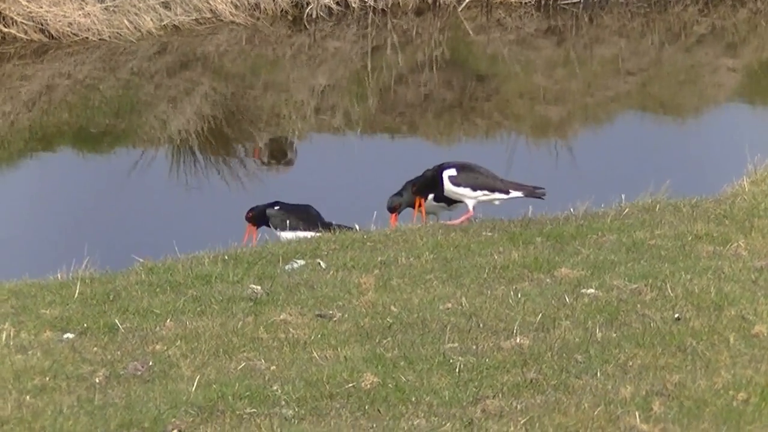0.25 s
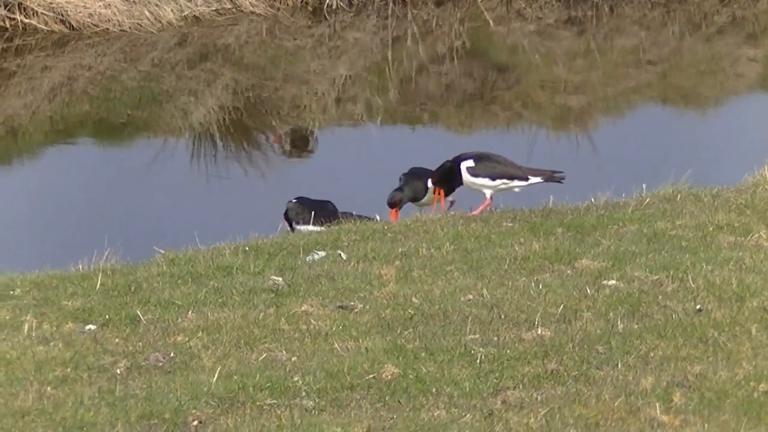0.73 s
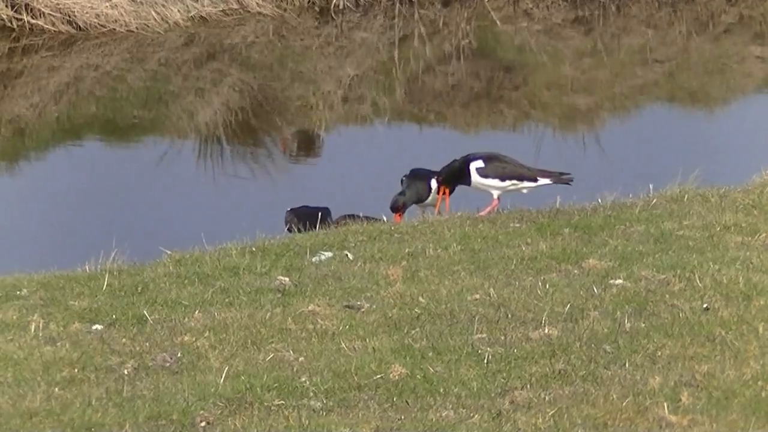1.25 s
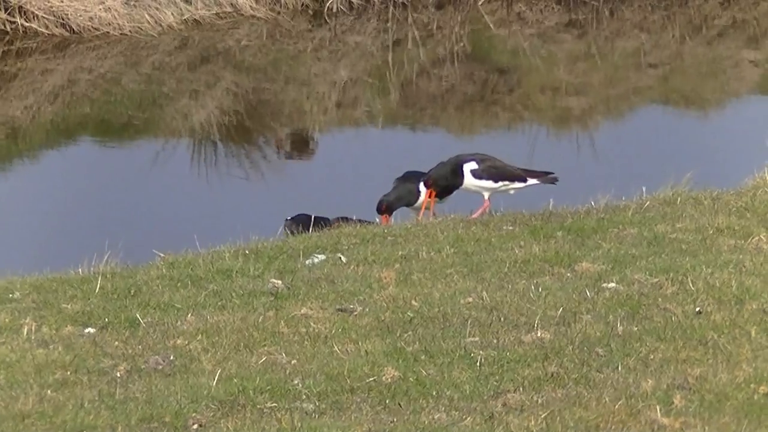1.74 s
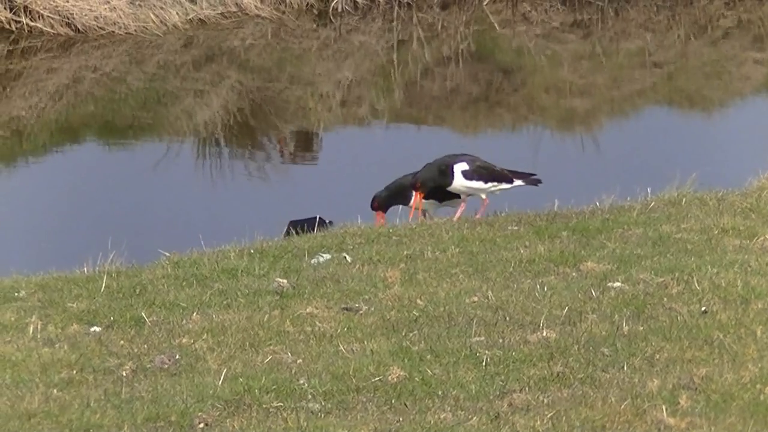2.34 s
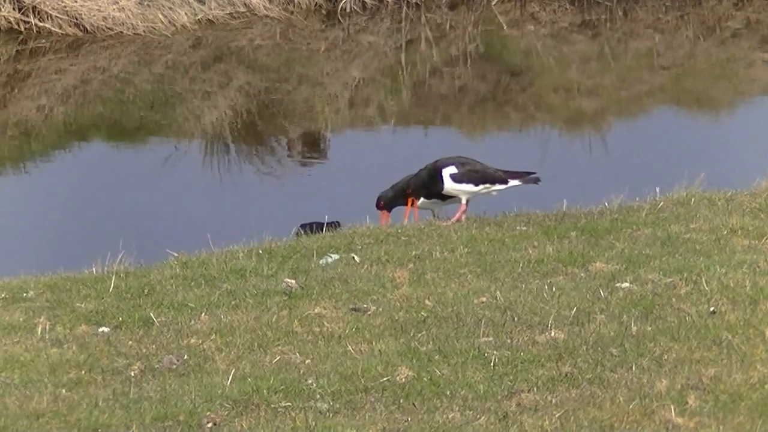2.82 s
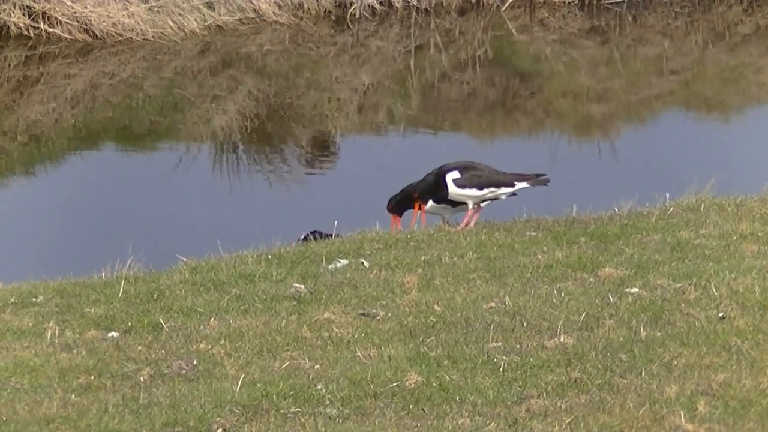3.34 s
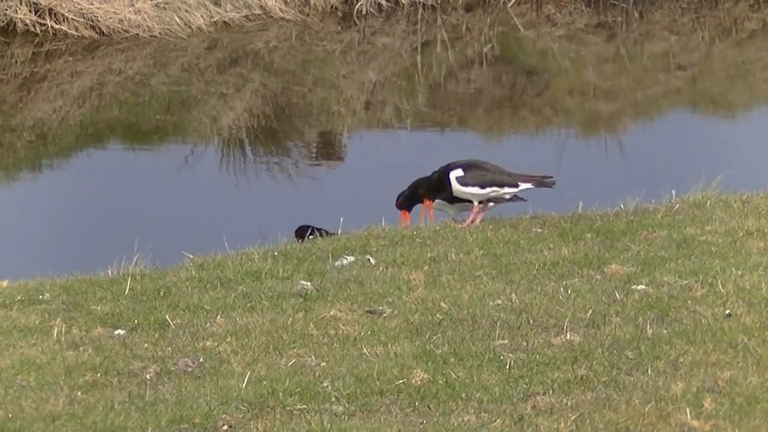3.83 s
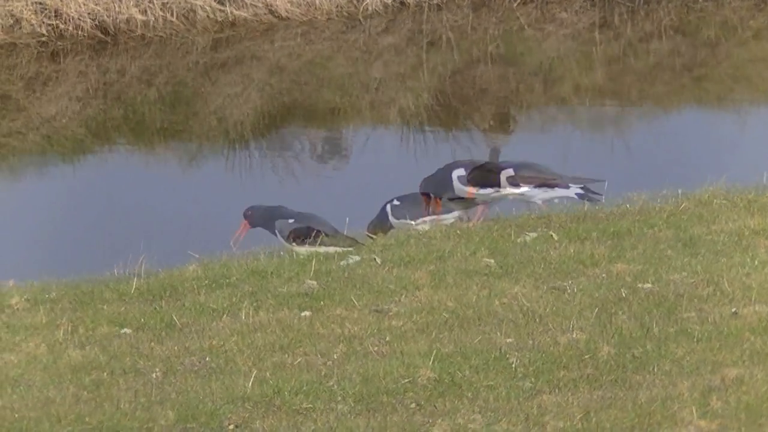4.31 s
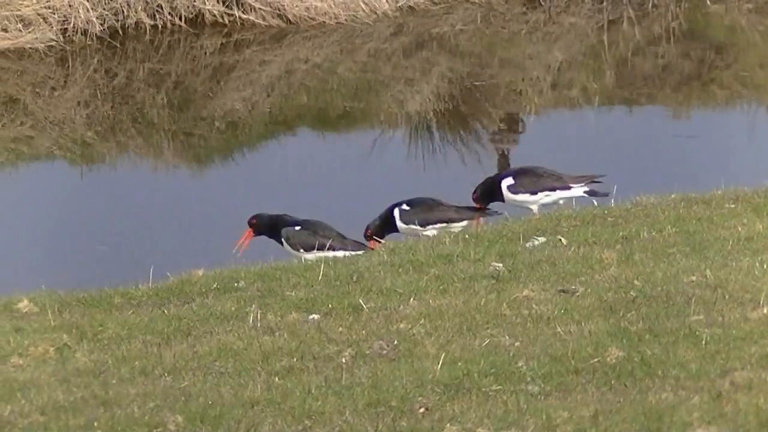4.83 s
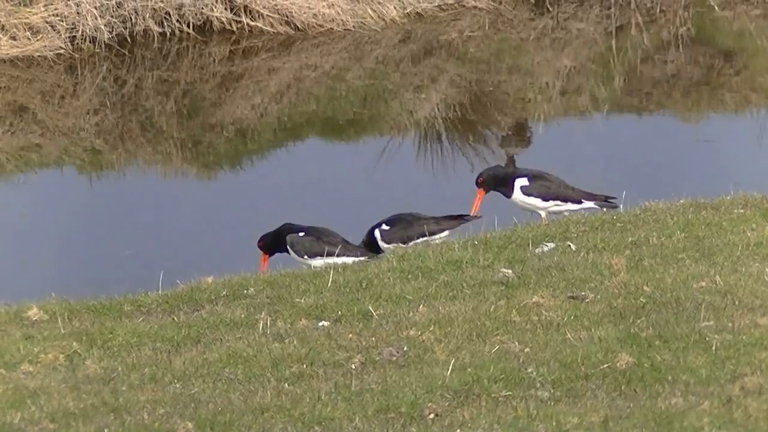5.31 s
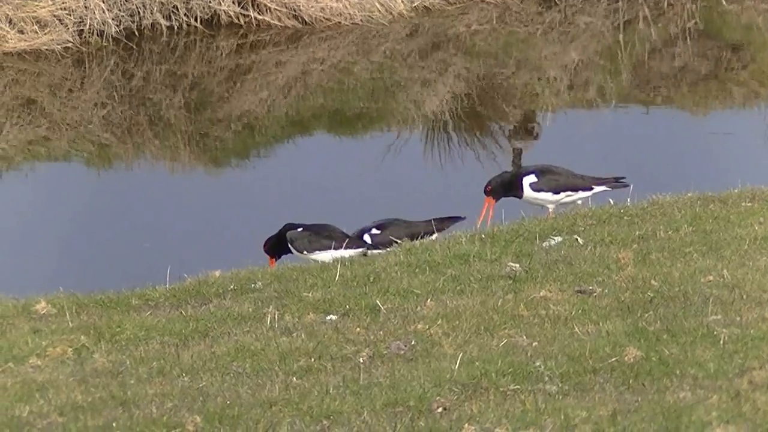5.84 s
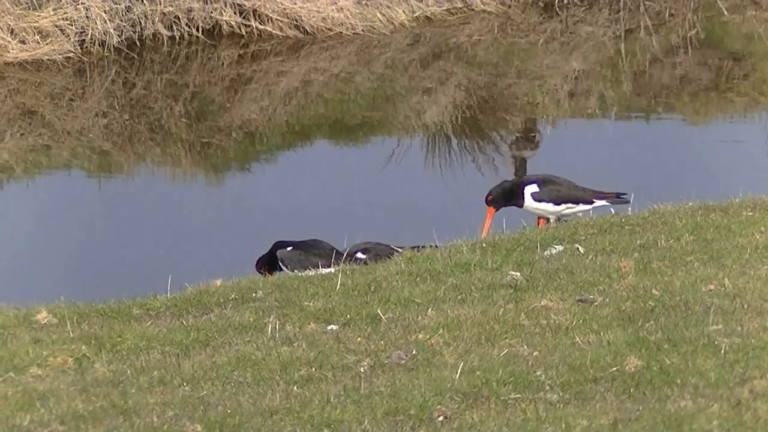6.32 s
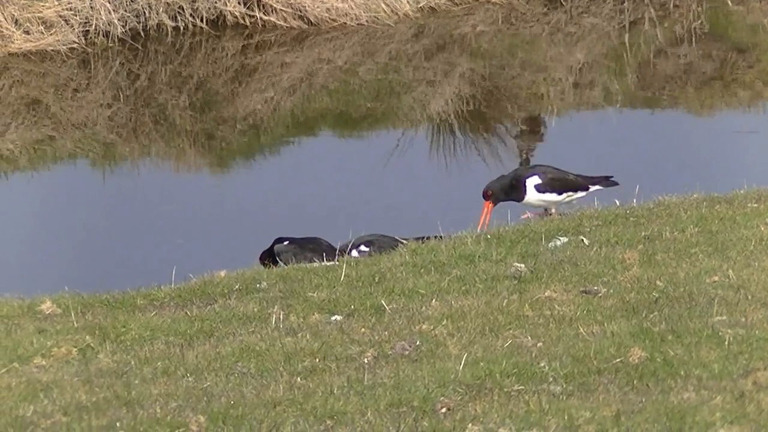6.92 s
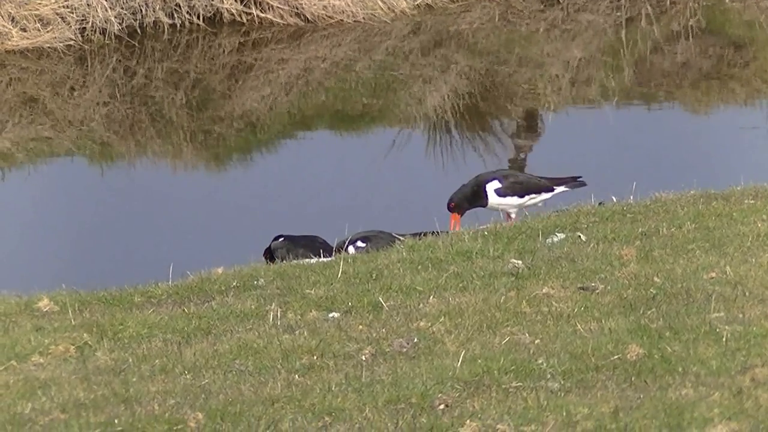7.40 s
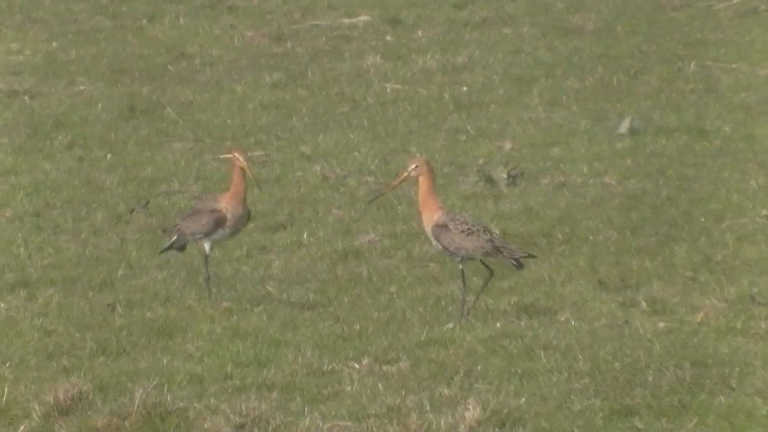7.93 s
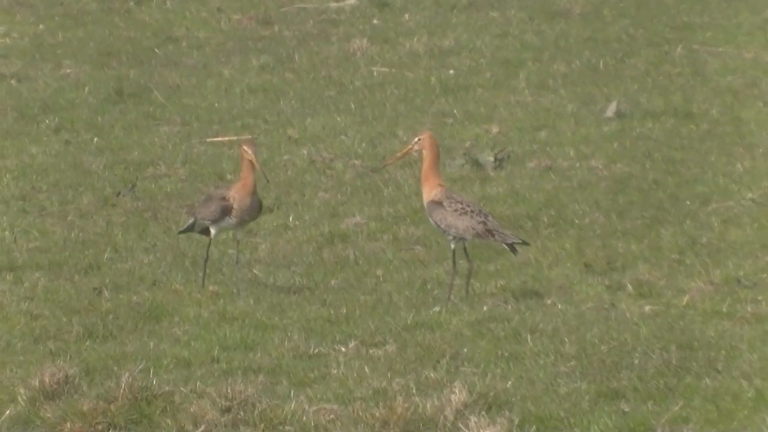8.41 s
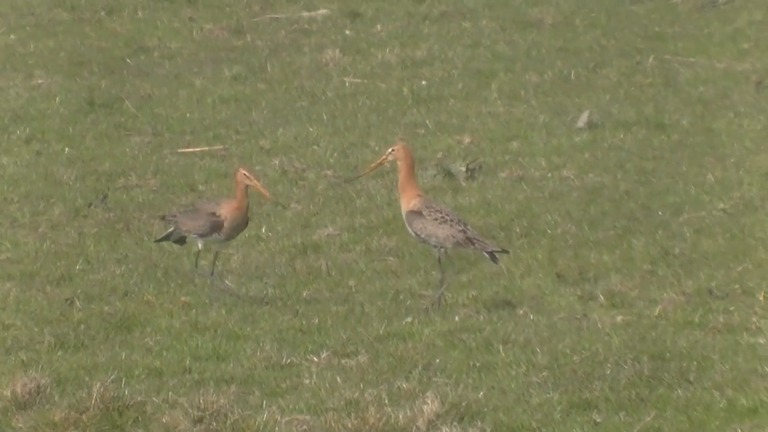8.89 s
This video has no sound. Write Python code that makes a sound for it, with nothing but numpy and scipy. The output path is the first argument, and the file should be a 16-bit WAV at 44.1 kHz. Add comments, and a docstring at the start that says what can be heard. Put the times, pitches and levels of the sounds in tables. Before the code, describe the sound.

Piercing wader whistles repeat in fast runs and pairs outdoors, lower trills bubbling behind, while light gusts thump the microphone before everything fades.

```python
"""Oystercatchers pipe at a ditch in open meadow: short arched whistles, near the microphones, echoed by the far bank.
Some pipe in runs, evenly spaced or irregular, one calls in pairs; others trill low rising notes, pipe or wail
further off. Each bird is a gliding stack of overtones shaped by a throat, with a little air noise. Filtered
noise makes the meadow hiss, the rumble and the gusts on the left port; decaying sines tick in the camera,
a steady one whines. Birds and meadow fade at the end."""
import sys
import numpy as np
from scipy import signal
from scipy.fft import rfft, irfft, next_fast_len
from scipy.io import wavfile
from scipy.ndimage import map_coordinates

SR = 44100
rng = np.random.default_rng(int(sys.argv[2]) if len(sys.argv) > 2 else 0)


def store_pcm(level_fs):
    """Save levels as 16-bit WAV."""
    pcm = np.round(np.clip(level_fs, -1, 1) * 32767).astype(np.int16)
    wavfile.write(sys.argv[1], SR, np.atleast_2d(pcm).T)


N = 403515
T = np.arange(N) / SR


def amp(db):
    """Gain of a level in dB."""
    return 10 ** (np.asarray(db) / 20)


def unit(x):
    """x at rms 1."""
    return x / np.sqrt(np.mean(x ** 2) + 1e-20)


def at_time(s, rows):
    """Value at s seconds, on straight lines between (s, value) rows."""
    return np.interp(s, *np.transpose(rows))


def along(points, hz):
    """(Hz, value) points read on a log frequency axis."""
    f, v = np.transpose(points)
    return np.interp(np.log(hz + 1), np.log(f + 1), v)


def wobble(rate_hz, size):
    """A smooth random curve through rate_hz random knots a second."""
    knots = rng.standard_normal(int(size * rate_hz / SR) + 4)
    return map_coordinates(knots, [np.arange(size) * rate_hz / SR])


def filtered(x, response):
    """x with its spectrum multiplied by a response of frequency."""
    m = next_fast_len(x.shape[-1] + 8192)
    spectrum = rfft(x, m) * response(np.fft.rfftfreq(m, 1 / SR))
    return irfft(spectrum, m)[..., :x.shape[-1]]


# steady wind at the ports, before the port offsets and sway: time_s, level_db
RUMBLE_LEVEL = [(0, -65), (3.9, -48.5), (4.3, -58), (6, -67), (9.15, -92)]
# hiss of the meadow: time_s, level_db
HISS_LEVEL = [(3, -50.5), (8, -49.5), (8.6, -55), (9.15, -61.5)]
# colour of the meadow hiss: freq_hz, density_db (per Hz)
HISS_COLOUR = [(100, -5.5), (700, -8.5), (1300, -3.5), (3000, -3), (6000, -21), (12000, -22), (15500, -40)]


def breeze():
    """Low wind rumble, unrelated between the ports, and soft meadow hiss that is wide only in its bass."""
    low = filtered(rng.standard_normal((2, N)), lambda f: (f / 100) ** 2.47 / (1 + (f / 120) ** 5.53))
    port_gain = amp([[3], [-5]])  # left, right
    sway = amp(2.5 * wobble(12, N))
    rumble = amp(at_time(T, RUMBLE_LEVEL)) * port_gain * unit(low) * sway
    mid, side = filtered(rng.standard_normal((2, N)), lambda f: amp(along(HISS_COLOUR, f)))
    side = filtered(side, lambda f: 0.98 / (1 + f / 900))
    hiss = unit(np.array([mid + side, mid - side]))
    return rumble + amp(at_time(T, HISS_LEVEL)) * hiss


# gusts on the left microphone port: start_s, end_s, level_db (before the edges), centre_hz
GUST_TIMES = [(0, 1, -42, 86), (0.754, 0.962, -33.5, 103), (3.248, 3.448, -39, 84),
              (3.647, 3.763, -29, 105), (3.855, 3.967, -27.5, 131), (4.255, 4.612, -37, 233),
              (4.77, 5.012, -31.5, 313), (5.241, 5.737, -41, 267), (6.441, 6.742, -48, 220),
              (7.728, 7.794, -36.5, 222), (7.802, 8.3, -57, 195), (8.874, 8.989, -34.5, 338)]


def gusts():
    """Turbulence hits the left port in sharp lumps of noise; the right port feels little of it."""
    out = np.zeros((2, N))
    for start, end, db, hz in GUST_TIMES:
        span = slice(round(start * SR), round(end * SR))
        size = len(T[span])
        lump_db = 7 * np.array([wobble(160, size), wobble(160, size)])
        lumps = rng.standard_normal((2, size)) * amp(lump_db)
        band = lambda f: (f / hz) ** 1.52 / (1 + (f / hz) ** 4.07) / (1 + (55 / (f + 1)) ** 3)
        edge = np.clip(np.minimum(T[span] - start, end - T[span]) / 0.022, 0, 1)
        out[:, span] += amp(db) * amp([[0], [-14]]) * edge * unit(filtered(lumps, band))
    return out


# clicks in the camera housing: time_s, level_db
TICK_TIMES = [(2.199, -22), (6.021, -31.5), (8.643, -37.5)]
# thin steady tone of the camera: freq_hz, level_db
WHINE_TONES = [(14562, -78)]


def camera():
    """Ticks ring the housing as two fast-decaying sines; a thin whine is always there."""
    out = np.zeros(N)
    t = np.arange(SR // 50) / SR
    body_swell = amp(-60 * t / .012) * (1 - np.exp(-t / .0006))
    body = 1.6 * body_swell * np.sin(2 * np.pi * 900 * t)
    click = 2 * amp(-60 * t / .002) * np.sin(2 * np.pi * 3300 * t)
    for s, db in TICK_TIMES:
        out[round(s * SR):][:len(t)] += amp(db) * (body + click)
    for hz, db in WHINE_TONES:
        out += amp(db) * np.sin(2 * np.pi * hz * T)
    return out


# resonance of the throat: freq_hz, gain_db
THROAT_GAIN = [(1000, -12), (2500, 6), (3300, 6.5), (5000, 4), (6500, -4), (7500, -2), (10500, -7.5),
               (13300, -17.5), (15000, -32)]
# beaming of overtones above SHINE_HZ from the bill: time_s, gain_db
BILL_SHINE = [(4.3, -1.5), (6.4, 1), (7.3, -6)]
SHINE_HZ = 9200
FALL_DEEPER = 1.653  # sag after the top over the sag setting
ONSET = .35  # swell exponent before the top; under 1 = abrupt start
CLIMB_PER_S = 20.5  # fastest climb, share of the pitch a second: quick notes start near their top
RASP_DB, RASP_HZ = -20, 9000  # air noise before its band filter; upper band edge


def whistles(notes, rise_s, fall_s, sag, flat, overtone_db, rough_db):
    """Arched notes (s, Hz, dB): pitch sags either side of its top, overtones pass the throat, air rasps."""
    out, air = np.zeros((2, N + SR))
    t = np.arange(-round(rise_s * SR), round(fall_s * SR)) / SR  # 0 at the top of the note
    from_top = np.clip(np.where(t < 0, -t / rise_s, t / fall_s), 0, 1)
    depth = np.where(t < 0, min(sag, CLIMB_PER_S * rise_s), sag * FALL_DEEPER)
    arch = 1 - depth * from_top ** flat
    swell = np.abs(np.cos(np.pi / 2 * from_top)) ** np.where(t < 0, ONSET, 1)
    order = np.arange(1, 7)[:, None]
    effort = swell ** (0.71 + 0.5 * (order - 1))  # overtones need full effort, so they fade first
    for s, hz, db in notes:
        pitch = hz * arch * (1 + .008 * wobble(400, size=len(t)))
        phase = 2 * np.pi * np.cumsum(pitch) / SR
        slope_db = at_time(s, overtone_db) - 9 * max(hz / 2600 - 1, 0)  # higher notes are purer
        posture_db = (order > 1) * rng.normal(0, 1.5, order.shape)
        posture_db = posture_db + (order * hz > SHINE_HZ) * at_time(s, BILL_SHINE)
        throat_db = along(THROAT_GAIN, order * pitch) - along(THROAT_GAIN, hz)
        gains = amp(slope_db * (order - 1) + posture_db + throat_db)
        lead = rng.normal(0, .7, order.shape)  # phase offset, radians
        audible = order * pitch < SR / 2
        tone = np.sum(gains * effort * audible * -np.cos(order * phase + lead), axis=0)
        start = round((s + t[0]) * SR) + SR // 4  # a quarter second of padding in front
        air[start:][:len(t)] += amp(db + RASP_DB + slope_db) * swell
        out[start:][:len(t)] += amp(db) * tone
    flutter = amp(rough_db * wobble(180, size=N))
    air_band = signal.butter(2, [RASP_HZ / 2, RASP_HZ], 'band', fs=SR, output='sos')
    rasp = signal.sosfilt(air_band, rng.standard_normal(N + SR))
    return (out + air * rasp)[SR // 4:][:N] * flutter


# distant piping as a whole: time_s, level_db
FAR_LEVEL = [(4, -46), (5, -54), (8.3, -53), (9.15, -68)]


def far_birds(count):
    """Distant piping at random moments: scattered pitches at first, later mostly one bird."""
    when, pitch, size = rng.random((count, 3)).T
    s = (np.arange(count) + when) / count * N / SR  # one note per equal slot, so the chorus never pauses
    hz = 2750 - np.where(s < 4, 650, 220) * pitch
    chorus = whistles(zip(s, hz, -6 * size), rise_s=.022, fall_s=.02, sag=.45, flat=1.6,
                      overtone_db=[(0, -6)], rough_db=.5)
    return amp(at_time(T, FAR_LEVEL)) * unit(chorus)


# birds repeating a low rising note: first_s, notes (count), spacing_s, slowing_s (times note number squared),
# top_pitch_hz, level_db (mean), rise_s, sag (share of pitch)
TRILL_SERIES = [(.176, 21, .1745, .00047, 1460, -47, .095, .33), (.02, 19, .2075, 0, 1470, -48, .095, .33),
                (4.56, 18, .189, 0, 1290, -53, .06, .14), (8.02, 2, .235, 0, 1370, -48, .07, .12)]


def trills():
    """Low notes rise, break off at once and repeat with slightly uneven timing and level."""
    out = np.zeros(N)
    for first, count, spacing, slowing, hz, db, rise_s, sag in TRILL_SERIES:
        notes = []
        for n in range(count):
            s = first + n * spacing + n * n * slowing + rng.normal(0, 0.004)
            notes.append((s, hz, db + rng.normal(0, 2.5)))
        out = out + whistles(notes, rise_s, fall_s=0.00776, sag=sag, flat=1.6,
                             overtone_db=[(0, -6.0)], rough_db=1.0)
    return out


# overtone strength of the near birds, brighter, a little duller, brightest at the end:
# time_s, overtone_db (gained per overtone)
NEAR_BRIGHTNESS = [(1, -1), (2.3, 0.06), (7.3, -0.64), (7.9, 0.5)]


def pipe(notes, rise_s, sag, fall_s=0.03, bright_db=0, flat=2.4):
    """The shared voice of the near birds: arched whistles whose overtone strength shifts over time."""
    brightness = [(s, db + bright_db) for s, db in NEAR_BRIGHTNESS]
    return whistles(notes, rise_s, fall_s, sag, flat, overtone_db=brightness, rough_db=1.3)


# single near notes by posture, bill away, sideways, toward the camera:
# bright_db (per overtone, added to the near brightness), rise_s, notes [top_s, top_pitch_hz, level_db];
# the hidden high notes use their own brightness and rise
SINGLE_NOTES = [(-3.5, .011, [(1.309, 2540, -26), (1.578, 2520, -29.5), (2.367, 2640, -30),
                (2.536, 2583, -32), (6.7, 2530, -29), (8.645, 3220, -42.5)]),
                (-0.54, .009, [(0.343, 2584, -27), (.89, 2620, -31.5), (1.211, 2616, -33.5),
                (1.495, 2620, -34), (2.671, 2670, -34.5), (2.971, 2646, -31), (3.413, 2625, -31),
                (3.555, 2660, -32), (4.191, 2640, -33), (5.242, 2540, -31), (6.724, 2600, -32.5),
                (7.06, 2610, -31.5), (7.234, 3170, -32), (7.265, 2514, -27.5), (7.349, 2555, -31),
                (7.43, 3233, -31), (7.462, 2464, -31), (7.544, 2560, -34.5), (7.673, 3310, -30),
                (7.701, 2410, -33), (7.824, 2705, -30), (7.888, 3320, -30.5), (8.035, 2720, -36),
                (8.05, 3080, -33.5), (8.085, 2650, -33), (8.15, 3260, -32), (8.298, 3066, -38),
                (8.31, 2670, -35.5), (8.409, 3276, -35), (8.423, 2590, -39.5), (8.56, 2654, -41.5),
                (8.79, 2700, -51)]), (1.5, .014, [(.047, 2533, -37), (6.448, 2495, -34.5)])]
HIDDEN_S, HIGH_HZ, HIDDEN_ECHO_DB = 7.2, 2900, 10.5


def single_notes():
    """Single arches, direct and sent to the bank; the late high piper, behind the near slope, echoes more."""
    seen, hidden_notes = np.zeros(N), []
    for bright_db, rise_s, notes in SINGLE_NOTES:
        hidden_here = [note for note in notes if note[0] >= HIDDEN_S and note[1] >= HIGH_HZ]
        seen_here = [note for note in notes if note not in hidden_here]
        seen = seen + pipe(seen_here, rise_s, 0.193, bright_db=bright_db)
        hidden_notes += hidden_here
    hidden = pipe(hidden_notes, 0.017, 0.29, fall_s=0.023, bright_db=-1.5)
    return seen + hidden, seen + amp(HIDDEN_ECHO_DB) * hidden


# runs of near notes sharing a pitch and level course, some evenly spaced, some irregular:
# tops [top_s], course [time_s, top_pitch_hz, level_db], rise_s, fall_s, sag (share of pitch),
# bright_db (per overtone, added to the near brightness), echo_db (sound sent to the bank)
NOTE_RUNS = [([.587, 0.974, 1.175, 1.389, 1.595, 1.801, 2, 2.209, 2.408, 2.617, 2.825, 3.035, 3.238, 3.428, 3.625, 3.83, 4.04, 4.242],
             [(.6, 2530, -32.5), (1, 2428, -33), (1.8, 2476, -28), (2, 2434, -33), (2.4, 2457, -28.5),
             (3.2, 2495, -31.5), (3.65, 2581, -26), (4.25, 2582, -30.5)], 0.0073, 0.024, 0.21, 0.33, -2),
             ([.118, .625, .835, 1.06], [(.65, 2660, -26.5), (.8, 3020, -26)], 0.012, .022, .2, -4.5, 2.2),
             ([3.31, 3.509, 3.71, 3.916, 4.122, 4.322], [(3.3, 2400, -35.5), (3.9, 2467, -31),
             (4.15, 2560, -31)], 0.0093, 0.03, 0.2, 0.093, -0.41),
             ([2.099, 2.297, 2.498, 2.92, 3.125, 3.37], [(2.1, 2270, -40), (3.4, 2210, -42.5)],
             .012, 0.024, 0.25, 0.1, -0.86), ([4.065, 4.292, 4.547], [(4.06, 3020, -39), (4.55, 2974, -29)],
             0.024, 0.03, 0.24, 0.1, 2.3), ([4.119, 4.355, 4.593, 4.814, 4.993, 5.149], [(4.1, 3360, -29),
             (4.6, 3326, -18.5), (5.15, 3230, -22.5)], 0.017, .022, 0.182, 0.11, -0.15),
             ([5.287, 5.414, 5.53, 5.651, 5.779, 5.884, 5.983, 6.082, 6.172, 6.251, 6.337, 6.421, 6.508, 6.602, 6.861, 7.004, 7.179, 7.615],
             [(5.28, 3140, -30), (6, 2998, -31.5), (6.55, 2842, -37.5), (6.85, 2560, -39)],
             .015, 0.025, 0.211, -1.6, 5.4)]


def piping_runs():
    """Runs of arches whose pitch and level follow a shared course; direct and as sent to the bank."""
    direct, sent = np.zeros((2, N))
    for times, course, rise_s, fall_s, sag, bright_db, echo_db in NOTE_RUNS:
        s, hz, db = np.transpose(course)
        notes = list(zip(times, np.interp(times, s, hz), np.interp(times, s, db)))
        whistled = pipe(notes, rise_s, sag, fall_s, bright_db)
        direct += whistled
        sent += amp(echo_db) * whistled
    return direct, sent


# near notes slurred up slowly from below: top_s, top_pitch_hz, level_db
SLURRED_NOTES = [(0.22, 2470, -36.5), (.465, 2550, -34.5), (0.775, 2563, -34.5), (1.715, 2534, -38.5),
                 (1.925, 2370, -38.5), (2.84, 2625, -39), (3.115, 2576, -37.5), (3.728, 2626, -36),
                 (4.009, 2660, -36.5)]


def slurs():
    """A long rise and deep sag slide each note up to its top."""
    return pipe(SLURRED_NOTES, .07, .26)


# two-part near calls, a quick pip and a fuller arch: pip_s, gap_s, arch_pitch_hz, arch_level_db
PAIRED_CALLS = [(4.402, 0.038, 2646, -30), (4.559, 0.045, 2617, -29), (4.721, 0.055, 2616, -30),
                (4.939, 0.037, 2682, -26.5), (5.148, 0.04, 2650, -28), (5.347, 0.033, 2649, -26.5),
                (5.536, 0.033, 2660, -27.5), (5.729, 0.034, 2697, -28), (5.934, 0.031, 2703, -26),
                (6.55, 0.034, 2600, -26.5), (6.751, 0.025, 2673, -28.5), (6.911, 0.038, 2705, -27),
                (7.099, 0.028, 2645, -28.5)]
PIP_HZ, PIP_UNDER_DB = 2589, -1.5  # a negative value puts the pip above the arch


def paired_calls():
    """One bird calls in pairs: a pip of constant top pitch, then an arch."""
    pips = [(s, PIP_HZ, db - PIP_UNDER_DB) for s, gap, hz, db in PAIRED_CALLS]
    arches = [(s + gap, hz, db) for s, gap, hz, db in PAIRED_CALLS]
    return pipe(pips, 0.008, 0.176, bright_db=-1.8) + pipe(arches, .018, 0.21, bright_db=0.35)


# long falling wails far off: top_s, top_pitch_hz, level_db
FAR_WAILS = [(5.53, 1680, -51.5), (6.45, 1824, -52.5), (7.39, 1858, -48.5)]


def wails():
    """A short rise and a long fall in pitch, with weak overtones and a rough level."""
    return whistles(FAR_WAILS, rise_s=.04, fall_s=.28, sag=.13, flat=1.3,
                    overtone_db=[(0, -12)], rough_db=3)


# loud near cries: top_s, top_pitch_hz, level_db
POINTED_CRIES = [(6.17, 2960, -21.5), (6.382, 2923, -22.5)]


def pointed_cries():
    """A nearly straight arch: the pitch climbs to a point and drops off."""
    return pipe(POINTED_CRIES, .027, 0.2, fall_s=0.0178, bright_db=0.7, flat=1.1)


# level calls of other birds: top_s, top_pitch_hz, level_db
LEVEL_CALLS = [(8.015, 4180, -46), (8.32, 1773, -47)]


def level_callers():
    """Little sag keeps the pitch almost level; weak overtones keep it plain."""
    return whistles(LEVEL_CALLS, rise_s=.05, fall_s=.015, sag=.04, flat=2.2,
                    overtone_db=[(0, -14)], rough_db=1.5)


def banks(direct, sent, count=5):
    """The rough far bank returns notes about 25 ms late, smeared, then once more; grass scatters a tail."""
    t = np.arange(SR // 4) / SR
    out = direct * amp([[.6], [-.6]])  # left, right
    for k in range(count):
        late = .025 + rng.normal(0, .0006)
        smear = np.zeros(len(t))
        for n, db in [(1, -28), (2, -36)]:
            smear += amp(db) * np.exp(-(t - n * late) / 0.0034) * (t > n * late)
        grass = amp(-33.5 - 60 * t / 0.22) * (t > .003)  # scattered tail
        shared, own = rng.standard_normal(len(t)), rng.standard_normal((2, len(t)))
        tail = (grass + smear) * (shared + 0.27 * own)
        tail[:, round(late * SR)] += amp(-4.5)
        echo = filtered(tail, lambda f: 1 / (1 + 1j * f / 9000))  # grass swallows the treble
        # the echo takes turns between several slightly different delays and tails, crossfading every 0.3 s
        share = np.clip(1 - np.abs((T / .3 - k) % count - 1), 0, 1)
        out = out + signal.fftconvolve((np.sqrt(share) * sent)[None], echo, axes=1)[:, :N]
    return out


def scene():
    """Birds in their echoes, wind and the camera's own sounds."""
    wind_and_camera = breeze() + gusts() + camera()
    others = far_birds(count=160) + trills() + wails() + level_callers()
    singles, singles_sent = single_notes()
    runs, runs_sent = piping_runs()
    common = others + slurs() + paired_calls() + pointed_cries()
    return banks(common + singles + runs, common + singles_sent + runs_sent) + wind_and_camera


def record(dry):
    """The camera keeps nothing from 15750 Hz up."""
    return filtered(dry, lambda hz: hz < 15750)


dry = scene()
out = record(dry)
store_pcm(out)
```